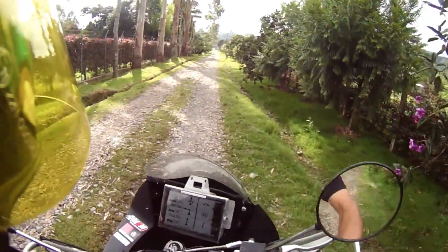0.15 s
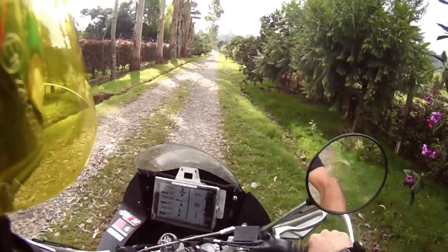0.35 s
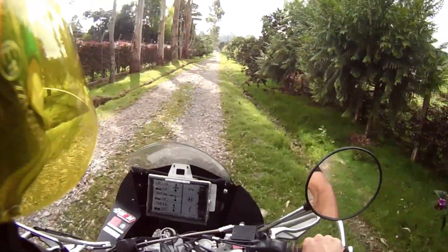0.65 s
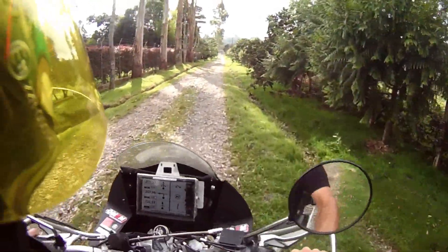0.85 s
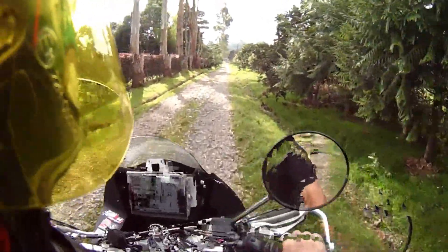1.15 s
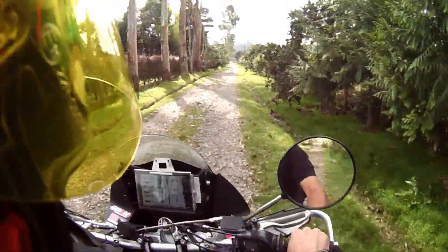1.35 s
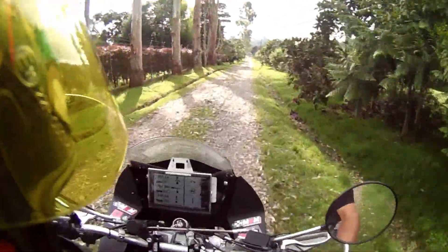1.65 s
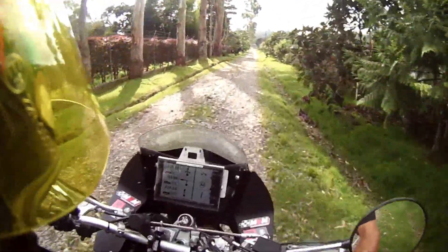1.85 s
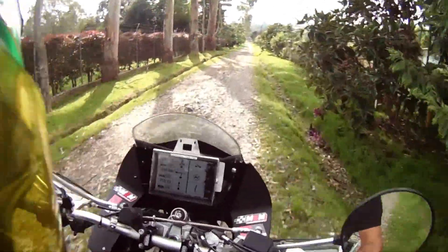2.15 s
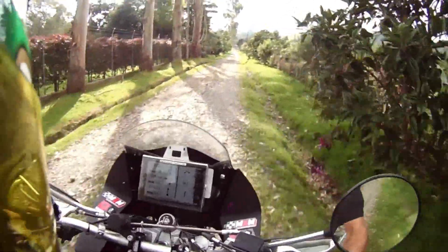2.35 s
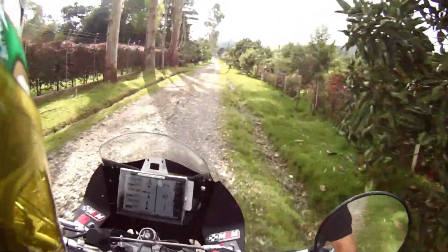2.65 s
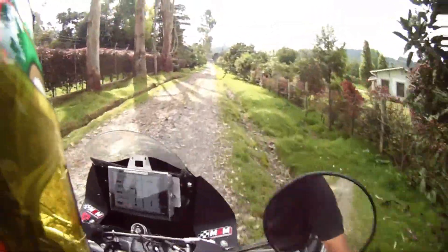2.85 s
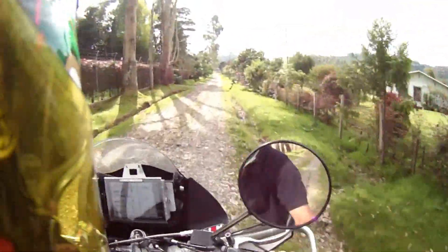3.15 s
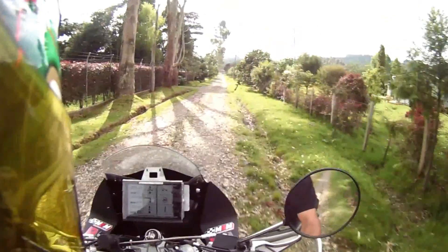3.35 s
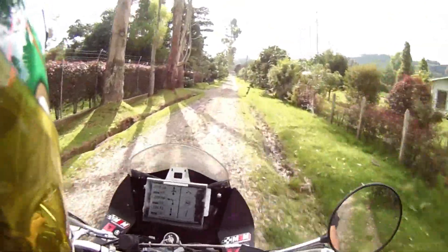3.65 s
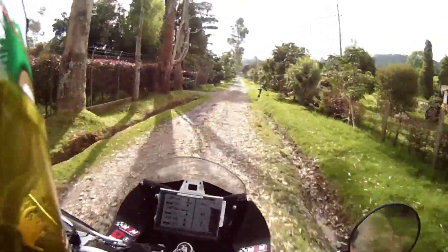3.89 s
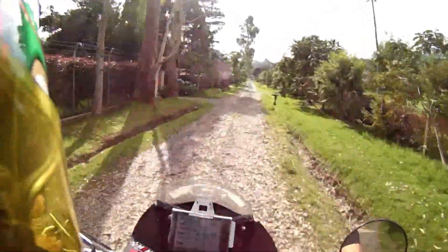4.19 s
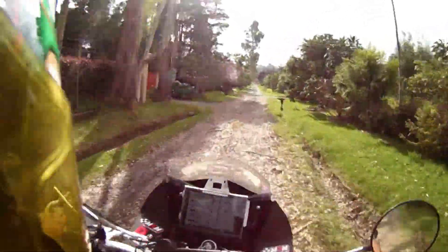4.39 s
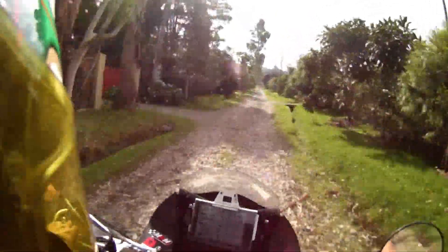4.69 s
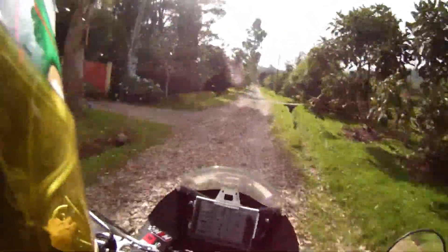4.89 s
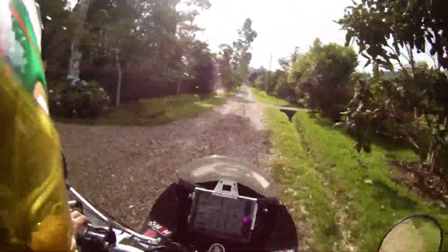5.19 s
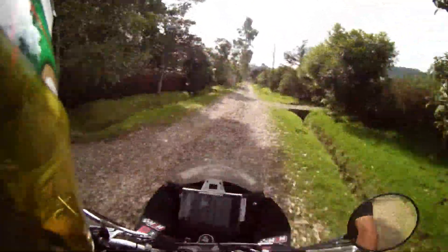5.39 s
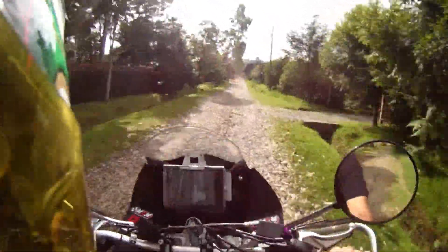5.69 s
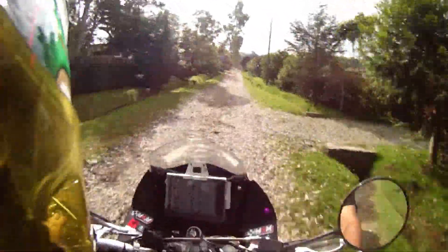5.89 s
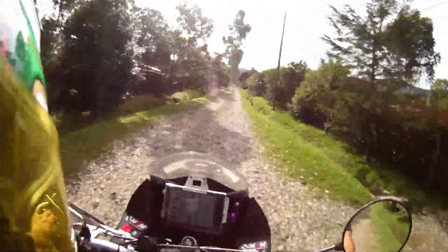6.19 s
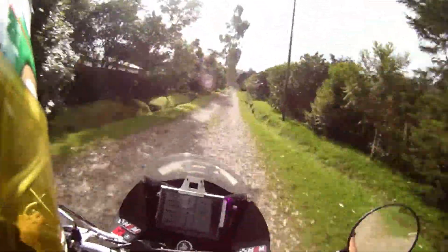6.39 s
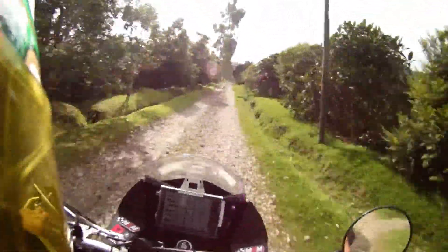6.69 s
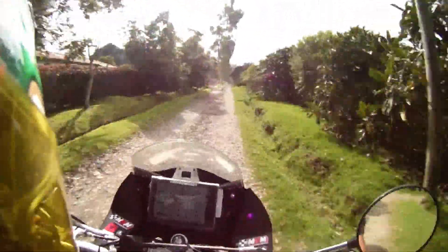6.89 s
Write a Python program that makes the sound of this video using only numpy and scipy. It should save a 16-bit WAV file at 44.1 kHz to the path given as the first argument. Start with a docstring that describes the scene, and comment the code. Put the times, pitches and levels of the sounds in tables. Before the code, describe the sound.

Heard from a cased microphone on a rider's helmet, outdoors and dry. From 0 to 0.7 s a single-cylinder motorbike idles softly, its gas puffs uneven and hollow over faint hiss and whirr. It then pulls away, about ten puffs a second quickening to eighteen by 1.9 s, where a small tick falls. A low thud at 2.2 s leads to a violent knock at 2.45 s, with low sway and a brief hard rattle. The engine quickens to a flutter near 3 s as wind arrives, surging at 3.55 s. Around 4.0 to 4.55 s the low hum drops for a gear change and engine speed falls, then climbs again. Lumpy wind roar dominates from 4.3 s. Ringing slaps around 1 kHz, with a sharp one at 5.12 s, grow denser after 5.8 s; the heaviest, at 6.7 to 6.9 s, crackle into overload until the cut at 7 s.

```python
"""A single-cylinder motorbike pulls away on a gravel track, heard from a case on the rider's helmet.
Uneven idle strokes come first: puffs of gas noise through pipe resonances, over low sine orders and a whirr.
The engine speeds up; then the mount takes a knock, made of short bursts at fixed pitches.
Wind grows into a roar of lumpy filtered noise, and the engine's hum drops while the clutch is in for a gear.
Ringing puffs of noise slap the case ever harder, and the highest peaks overload the input."""
import sys
import numpy as np
from scipy import signal
from scipy.io import wavfile
from scipy.ndimage import uniform_filter1d

SR = 44100
rng = np.random.default_rng(int(sys.argv[2]) if len(sys.argv) > 2 else 0)


def output_pcm(signal):
    """Save a mono or channel-first signal as 16-bit PCM at the path in sys.argv[1].

    Samples are clipped to [-1, 1] before scaling.
    """
    pcm = np.clip(np.atleast_2d(signal).T, -1, 1) * 32767
    wavfile.write(sys.argv[1], SR, np.round(pcm).astype(np.int16))


def undo_db(level):
    """Turn decibels back into plain size, where 20 dB means ten times bigger."""
    steps = np.asarray(level, float) / 20
    return 10 ** steps


N = 310464
T = np.arange(N) / SR  # time [s]

# Engine speed: (time [s], firing rate [1/s])
FIRING_RATE = [(0, 7.61), (.7, 10.24), (.9, 11.05), (1.1, 11.36), (1.25, 12.11), (1.6, 14.52), (1.9, 17.99),
               (2.8, 24.94), (3.1, 29.1), (3.4, 31.53), (3.75, 37.79), (4.2, 39.02), (4.45, 31.48),
               (4.7, 29.32), (5.3, 32.61), (6.2, 36.86), (6.55, 40.19), (7.04, 40.67)]
FIRST_TURN = .37  # phase at the start [firing cycles]
# Uneven strokes at idle: (time [s], strength re a usual firing [dB])
IDLE_STROKES = [(0.001, 11), (0.117, 6), (0.186, 3.5), (0.313, 4), (0.371, 0), (0.434, -6.5), (0.483, 0.5),
                (0.535, 4), (0.614, -1)]
PULL_S = .7  # the throttle opens: strokes follow the firing rate from here [s]
HALF_BURST = 0.033  # weaker burst half a cycle after each firing, share of a full one
# Engine effort: (time [s], chuff level within 3.5-5 kHz [dB])
EFFORT_LEVEL = [(0, -72), (.3, -63.5), (.85, -67.5), (1.3, -62.5), (1.9, -61), (2.4, -56.5), (2.9, -55),
                (3.1, -51.5), (3.6, -51.5), (4.2, -45), (4.4, -50), (4.8, -54.5), (5.4, -49), (5.9, -51),
                (6.4, -45), (7.04, -39.5)]
# Spectrum of the chuff through the case: (frequency [Hz], relative level per hertz [dB])
CHUFF_SPECTRUM = [(88, -41), (150, -37.5), (321, -5.5), (359, -7), (460, -5), (516, -6), (699, -3.5),
                  (984, 2.5), (1880, -3), (2020, -11.5), (2640, -7.5), (3580, -33), (4250, -17),
                  (5340, -28.5), (14100, -81)]
# Resonances of pipe and case: (frequency [Hz], width [Hz], relative level [dB])
PIPE_AND_CASE_MODES = [(326, 38, -9.5), (915, 43, -16.5), (1184, 46, -10.5), (1388, 100, -15.5),
                       (1878, 150, -13.5), (2650, 290, -16), (7500, 200, -48.5)]
# Spectrum of the whirr: (frequency [Hz], relative level per hertz [dB])
WHIRR_SPECTRUM = [(3240, -26.5), (5500, 0), (6210, -0.5), (7560, 3), (14100, -26)]
# Whirr level at 20 firings a second and mean effort [dB], growth with speed, share of the effort's dB
WHIRR_DB, WHIRR_DB_PER_OCTAVE, WHIRR_FOLLOWS = -63.5, 8.5, .1
# The crank order grows with the firing rate up to a plateau: level there [dB], slope, its start [1/s]
CRANK_DB, CRANK_DB_PER_HZ, CRANK_FULL_HZ = -39, 1.4, 30.
PIPE_DB, PIPE_DB_PER_HZ = -32.5, .9  # pipe orders: level at 40 firings a second [dB], and growth
PIPE_HZ, PIPE_WIDTH_HZ = 292, 38
FIFTH_DB, BOOM_HZ, BOOM_WIDTH_HZ = -53.5, 76, 42  # the fifth order sounds as it passes a low resonance
CLUTCH_IN_S, CLUTCH_OUT_S, CLUTCH_EDGE_S = 4.02, 4.56, .04
CRANK_LOSS_DB, PIPE_LOSS_DB = 18, 6  # loss of hum while the clutch is in

# Low shaking of the mount, surging around the big blow: (time [s], level [dB])
SHAKE_LEVEL = [(0, -49), (1.2, -51), (2.17, -43), (2.37, -39.5), (2.41, -22), (2.57, -41), (2.78, -47),
               (4.27, -48), (4.47, -43), (5.2, -40), (5.9, -44), (6.6, -32), (7.04, -33)]
# Spectrum of the shaking: (frequency [Hz], relative level per hertz [dB])
SHAKE_SPECTRUM = [(8.8, -38), (15, 10.5), (70, 4), (102, 0.5), (151, -8), (225, -8), (300, -10.5),
                  (390, -10), (660, -120)]
# Sharp ticks, about a cycle long, the late ones peaks of the wind slaps:
# (time [s], peak level [dB], frequency [Hz])
SHARP_TICKS = [(1.888, -26, 520), (2.4528, -4, 1250), (5.127, -7, 1500), (5.16, -9, 1600),
               (6.496, -5, 1000), (6.771, -2, 1100), (6.784, -1, 1100), (6.821, -3, 1000)]
TICK_RISE, TICK_FALL = .33, 1.1  # [cycles]
# Blows on the mount: (time [s], peak level [dB])
MOUNT_BLOWS = [(2.216, -34), (2.4493, .5)]
# Modes each blow thuds with: (frequency [Hz], level re the blow [dB])
THUD_MODES = [(92, -12.5), (160, 0), (235, -12), (465, -6)]
THUD_RISE, THUD_FALL = 1.3, 1.7  # [cycles]
# The mount sways on bumps: (time [s], peak level [dB], rise [s], fall [s])
MOUNT_SWAYS = [(2.229, -21, .008, .03), (2.308, -30, .015, .015), (2.4265, -12, .04, .018),
               (2.484, -19, .008, .016)]
SWAY_HZ = 54
# The case rattles during the big blow: (time [s], peak level [dB])
CASE_RATTLES = [(2.42, -34), (2.4462, -14), (2.4527, -16), (2.4605, -16)]
# Modes each rattle rings with: (frequency [Hz], level re the rattle [dB], fall [s])
CASE_MODES = [(900, -8, .002), (1600, 0, .004), (2300, -10, .001), (3000, -20, .0015)]

# Wind on the case: (time [s], roar level [dB], level of the deep part re the roar [dB])
WIND_LEVEL = [(2.55, -60, 11), (2.75, -46.5, 3), (3.03, -33.5, 0), (3.2, -40.5, -9), (3.4, -26.5, -4),
              (3.55, -20.5, -5), (3.71, -36, -4.5), (3.9, -28, -3), (4.27, -21, -10), (4.34, -26.5, -4.5),
              (4.42, -20.5, -15.5), (4.62, -20, -12), (5.05, -21.5, -10), (5.45, -16, -18.5),
              (5.8, -19.5, -13), (6.0, -16, -9), (6.4, -15.5, -13), (7.04, -20, -11.5)]
# Spectrum of the roar: (frequency [Hz], relative level per hertz [dB])
ROAR_SPECTRUM = [(59, -36), (100, -34), (224, -25.5), (312, -16.5), (444, -6.5), (502, -2.5), (1130, 4.5),
                 (1410, -1.5), (2420, -20.5), (4230, -30), (5430, -47.5), (7560, -64.5), (14100, -79)]
# The loudest eddies slapping the case: (time [s], peak level under the bright edge [dB], centre [Hz])
LOUD_SLAPS = [(3.584, -12.5, 1000), (4.368, -11.5, 945), (4.782, -12.5, 1100), (4.984, -11, 888),
              (5.093, -12.5, 1130), (5.123, -5, 1240), (5.201, -13.5, 980), (5.354, -12.5, 947),
              (5.399, -9, 1040), (5.454, -13, 1050), (5.486, -8, 1090), (5.536, -12.5, 1170),
              (5.821, -6.5, 1300), (5.863, -9, 826), (5.901, -19, 816), (5.937, -14, 867),
              (5.979, -5, 1070), (6.054, -7.5, 1020), (6.097, -5.5, 1120), (6.132, -12.5, 759),
              (6.168, -3, 790), (6.198, -7.5, 860), (6.366, -14, 1170), (6.396, -4.5, 950),
              (6.494, -4, 861), (6.613, -8, 870), (6.703, -3, 1000), (6.769, 2.5, 1140), (6.819, -1, 930),
              (6.89, -3.5, 1010), (6.968, -6.5, 1120)]
SLAP_RISE_S, SLAP_S, EDGE_DB = .002, .014, -24  # start, length, level of the bright edge
# Smaller slaps come by chance: mean rate, mean peak above the roar, mean centre
SMALL_PER_S, SMALL_DB, SMALL_HZ = 11, 0.5, 1000

# Spectrum of the preamplifier hiss: (frequency [Hz], relative level per hertz [dB])
HISS_SPECTRUM = [(1760, -19), (3000, -4), (3710, -7), (4360, 12), (5540, 10), (14100, 16.5)]
HISS_DB = -73.5
WHINE_HZ, WHINE_DB = 7640, -84  # a faint steady tone


def evened(x):
    """Normalisation to unit root-mean-square value."""
    return x / np.sqrt(np.mean(x ** 2) + 1e-20)


def curves(rows):
    """Linear interpolation of each column over time."""
    s, *columns = np.transpose(rows)
    return [np.interp(T, s, c) for c in columns]


def colour(x, points):
    """Minimum-phase filtering: a (Hz, dB) spectrum fixes a causal response; noise power is kept."""
    f, db = np.transpose(points)
    hz = abs(np.fft.fftfreq(8192, 1 / SR))
    gain_db = np.interp(np.log(hz + 1), np.log(f + 1), db)
    log_gain = np.log(undo_db(np.maximum(gain_db, -100)))
    taps = np.fft.ifft(np.exp(np.conj(signal.hilbert(log_gain)))).real[:4096]
    return signal.oaconvolve(x, taps / np.linalg.norm(taps))[:N]


def resonate(x, hz, width):
    """Damped resonance: one pole pair whose decay sets the bandwidth; noise power is about kept."""
    r = np.exp(-np.pi * width / SR)
    angle = 2 * np.pi * hz / SR
    gain = np.sqrt(2 * (1 - r ** 2)) * np.sin(angle)
    return signal.lfilter([gain], [1, -2 * r * np.cos(angle), r ** 2], x)


def lumps(low_hz, top_hz):
    """Random modulation: band-limited noise between two rates, rms 1."""
    band = signal.butter(2, [low_hz, top_hz], "bandpass", fs=SR, output="sos")
    return evened(signal.sosfilt(band, rng.standard_normal(N)))


def patchy(x, patchy_db):
    """Non-stationary noise: random patches of more and less level over time and frequency."""
    z = signal.stft(x, nperseg=512, noverlap=384)[2]
    field = uniform_filter1d(rng.standard_normal(z.T.shape), size=10, axis=0)
    field = uniform_filter1d(field, size=5, axis=1)
    return signal.istft(z * undo_db(patchy_db * evened(field).T), nperseg=512, noverlap=384)[1][:N]


def add(mix, s, db, hz, rise, fall):
    """Damped oscillation: a burst at one pitch swells to its peak at time s and dies."""
    near = slice(round((s - .2) * SR), round((s + .2) * SR))
    t = T[near] - s
    envelope = np.exp(-(t / np.where(t < 0, rise, fall)) ** 2)
    mix[near] += undo_db(db) * envelope * np.cos(2 * np.pi * hz * t)


def engine(body_s=0.022, tail_s=0.088, tail_share=0.61, alike=0.68, whirr_steady=0.89):
    """Pulsed flow noise: every stroke opens a puff of gas that holds, then dies in echoes; low orders hum."""
    level_db = curves(EFFORT_LEVEL)[0]
    turns, kicks = strokes(HALF_BURST)

    t = T[:SR // 4]
    decay = np.exp(-(t / body_s) ** 2) + tail_share * np.exp(-t / tail_s)
    shape = (1 - np.exp(-t / 0.00041)) * decay
    puff = signal.oaconvolve(kicks, shape)[:N]
    mean = np.sqrt(uniform_filter1d(puff ** 2, size=SR // 3) + 1e-9)  # effort alone sets the loudness
    puff = puff / mean
    echo = shape * rng.standard_normal(len(t))  # the same at every stroke
    echoes = signal.oaconvolve(kicks, echo)[:N] / mean

    steady = .5  # flow between the puffs
    gas = (steady + puff) * undo_db(0.82 * lumps(55, 530)) * rng.standard_normal(N) + alike * echoes
    chuff = colour(gas, CHUFF_SPECTRUM)
    chuff = chuff + sum(undo_db(db) * resonate(gas, hz, width) for hz, width, db in PIPE_AND_CASE_MODES)
    # the case wall dulls the top
    chuff = signal.sosfilt(signal.butter(2, 9500, fs=SR, output="sos"), chuff)
    treble = signal.sosfilt(signal.butter(4, [3500, 5000], "bandpass", fs=SR, output="sos"), chuff)
    chuff = undo_db(level_db) * chuff / treble.std()

    whirr_db = WHIRR_DB + WHIRR_DB_PER_OCTAVE * np.log2(curves(FIRING_RATE)[0] / 20)
    whirr_db = whirr_db + WHIRR_FOLLOWS * (level_db - level_db.mean())
    whirr = evened(colour((whirr_steady + puff) * rng.standard_normal(N), WHIRR_SPECTRUM))
    return chuff + undo_db(whirr_db) * whirr + hum(turns)


def strokes(second, uneven_db=2.0):
    """Impulse excitation: spikes at the idle strokes, then at every firing and, weaker, half a cycle later."""
    turns = FIRST_TURN + np.cumsum(curves(FIRING_RATE)[0]) / SR
    halves = np.floor(2 * turns).astype(int)
    strength = np.where(halves % 2, np.clip(second, 0, 1), 1)
    kicks = np.diff(halves, prepend=halves[0]) * strength * (T > PULL_S)
    kicks = kicks * undo_db(uneven_db * rng.standard_normal(halves[-1] + 1))[halves]
    for s, db in IDLE_STROKES:
        kicks[round(s * SR)] = undo_db(db)
    return turns, kicks


def hum(turns):
    """Harmonic orders of the firing rate: crank, fifth order, and those the pipe resonance favours."""
    firing_hz = np.gradient(turns) * SR
    going_in = np.tanh((T - CLUTCH_IN_S) / CLUTCH_EDGE_S)
    coming_out = np.tanh((T - CLUTCH_OUT_S) / CLUTCH_EDGE_S)
    clutch = (going_in - coming_out) / 2  # 1 while the clutch is in
    crank_db = CRANK_DB + CRANK_DB_PER_HZ * np.minimum(firing_hz - CRANK_FULL_HZ, 0) - CRANK_LOSS_DB * clutch
    pipe_db = PIPE_DB + PIPE_DB_PER_HZ * (firing_hz - 40) - PIPE_LOSS_DB * clutch

    def order(k):
        """Phase-locked harmonic: a sine at k times the firing rate, its level wandering slowly."""
        return undo_db(0.5 * lumps(0.6, 4)) * np.sin(2 * np.pi * (k * turns + rng.random()))

    pipe = sum(order(k) / (1 + ((k * firing_hz - PIPE_HZ) / PIPE_WIDTH_HZ) ** 2) for k in range(6, 15))
    fifth = order(5) / np.sqrt(1 + ((5 * firing_hz - BOOM_HZ) / BOOM_WIDTH_HZ) ** 2)
    return undo_db(crank_db) * order(2) + undo_db(FIFTH_DB) * fifth + undo_db(pipe_db) * pipe


def mount():
    """Short bursts and low noise: shaking, blows, sways and rattles of the mount, and sharp ticks,
    the late ones peaks of the wind slaps."""
    shake_db = curves(SHAKE_LEVEL)[0] + 0.4 * lumps(2.8, 20)
    out = undo_db(shake_db) * colour(rng.standard_normal(N), SHAKE_SPECTRUM)
    for s, db, hz in SHARP_TICKS:
        add(out, s, db, hz, TICK_RISE / hz, TICK_FALL / hz)
    for s, db in MOUNT_BLOWS:
        for hz, mode_db in THUD_MODES:
            add(out, s, db + mode_db, hz, THUD_RISE / hz, THUD_FALL / hz)
    for s, db, rise, fall in MOUNT_SWAYS:
        add(out, s, db, SWAY_HZ, rise, fall)
    for s, db in CASE_RATTLES:
        for hz, mode_db, fall in CASE_MODES:
            add(out, s, db + mode_db, hz, .0015, fall)
    return out


def wind(lumpy_db=3.5, grain_db=3.5):
    """Turbulence noise: lumps and finer grain ring the case; deeper gusts add a low roar."""
    level_db, depth_db = curves(WIND_LEVEL)
    # the wind builds as the bike starts to roll
    level_db = level_db - 25 * np.clip(WIND_LEVEL[0][0] - T, 0, 2)
    swing_db = lumpy_db * lumps(6, 35) + grain_db * lumps(40, 300)
    eddies = undo_db(5 * np.tanh(swing_db / 5))  # held within 5 dB either way
    roar = evened(colour(eddies * rng.standard_normal(N), ROAR_SPECTRUM))
    deep = evened(resonate(resonate(eddies * rng.standard_normal(N), 343, 260), 462, 300))
    depth_db = depth_db + 1.83 * lumps(1.77, 11.3)
    return undo_db(level_db) * lulls() * patchy(roar + undo_db(depth_db) * deep, 1.0)


def lulls(depth=0.41, lead_s=0.0076, length_s=0.0088):
    """Flow separation: the flow lifts off the case for a moment before each loud eddy slaps it."""
    gain = np.ones(N)
    for s, *_ in LOUD_SLAPS:
        near = slice(round((s - .05) * SR), round((s + .02) * SR))
        dip = np.exp(-((T[near] - s + lead_s) / length_s) ** 2)
        gain[near] *= 1 - np.clip(depth, 0, 1) * dip
    return gain


def slaps():
    """Transient excitation: each eddy is a quick puff of roar ringing round its centre, with a bright edge."""
    out, t = np.zeros(N + 4000), T[:4000]
    roar = colour(rng.standard_normal(N), ROAR_SPECTRUM)
    edge = evened(resonate(resonate(rng.standard_normal(N), 2400, 2200), 3600, 2600))
    shape = (1 - np.exp(-t / SLAP_RISE_S)) * np.exp(-(t / SLAP_S) ** 2)
    for s, db, hz in list(LOUD_SLAPS) + small_slaps():
        start = round(s * SR)
        air, bright = (np.take(x, start + np.arange(4000), mode="wrap") for x in (roar, edge))
        puff = shape * (.5 * air + resonate(air, hz, 680))
        bright_edge = undo_db(EDGE_DB) * shape * np.exp(-t / 0.015) * bright
        out[start:][:4000] += undo_db(db) * (puff / abs(puff).max() + bright_edge)
    return out[:N]


def small_slaps():
    """Poisson process: chance eddies with exponential gaps, as rows of time, peak and centre."""
    gap, size, centre = rng.random((200, 3)).T
    s = WIND_LEVEL[0][0] - np.cumsum(np.log(gap)) / SMALL_PER_S
    roar_db = np.interp(s, *np.transpose(WIND_LEVEL)[:2])
    db = roar_db + SMALL_DB + 6 * (size - .5)
    hz = SMALL_HZ * (1 + .5 * (centre - .5))
    return np.transpose([s, db, hz])[s < T[-1]].tolist()


def scene():
    """Superposition: the pressures of all sources add at the single microphone."""
    return (engine() + mount() + wind() + slaps())[None]


def low_pass(x):
    """Removes everything above the highest recorded frequency."""
    return signal.sosfilt(signal.butter(12, 14210, fs=SR, output="sos"), x)


def record(dry):
    """Amplifier noise and saturation: hiss and a whine are added, then full scale clips the sum hard."""
    hiss = undo_db(HISS_DB) * colour(rng.standard_normal(N), HISS_SPECTRUM)
    whine = undo_db(WHINE_DB) * np.sin(2 * np.pi * WHINE_HZ * T)
    mix = np.clip(dry + hiss + whine, -1, 1)
    return low_pass(mix)


dry = scene()
out = record(dry)
output_pcm(out)
```